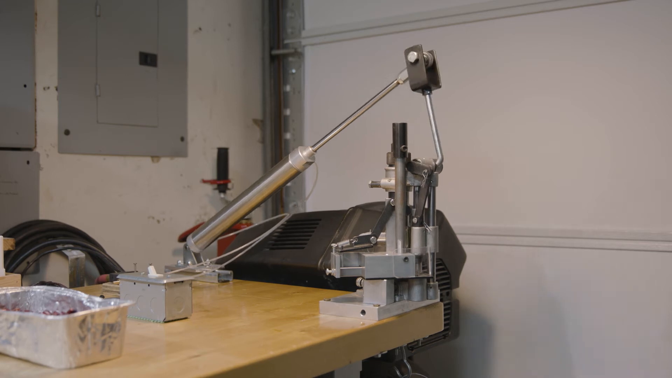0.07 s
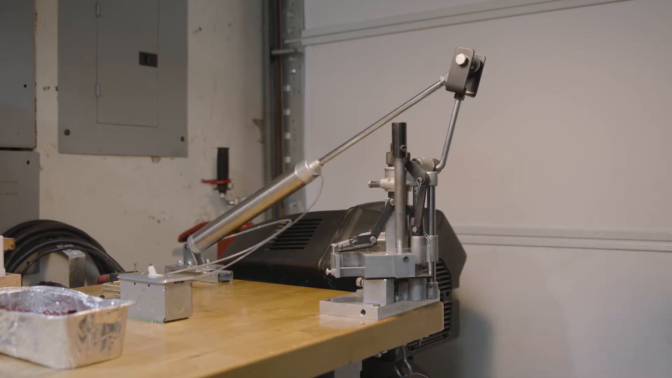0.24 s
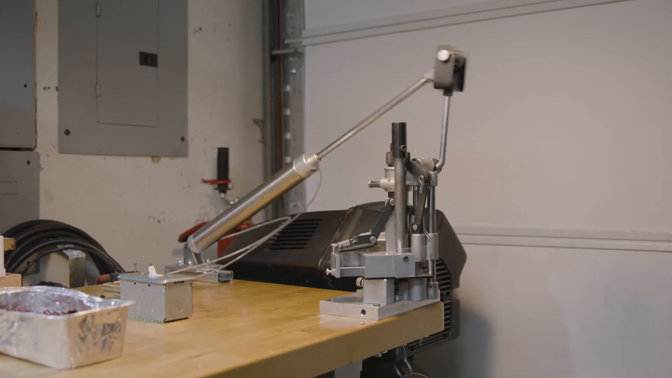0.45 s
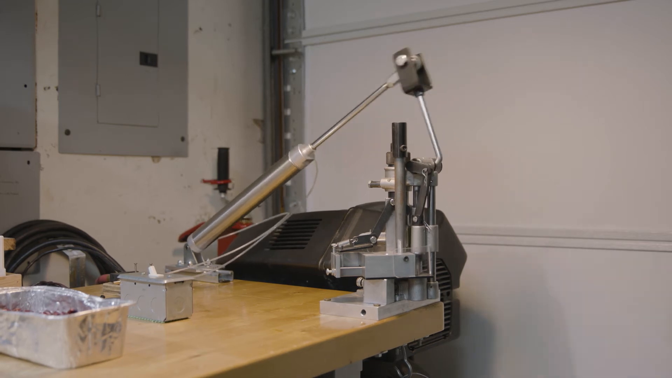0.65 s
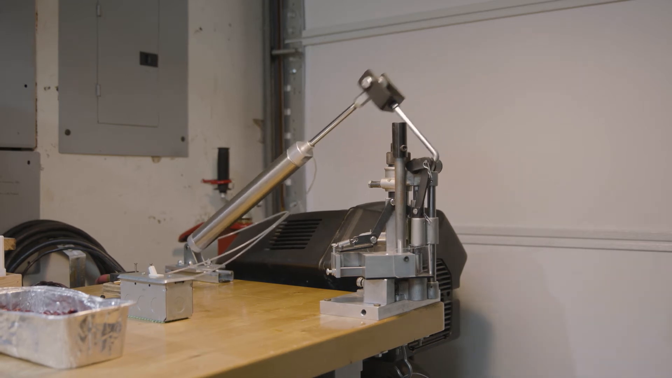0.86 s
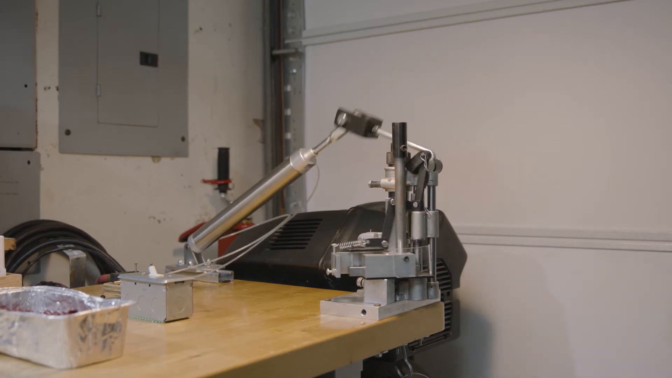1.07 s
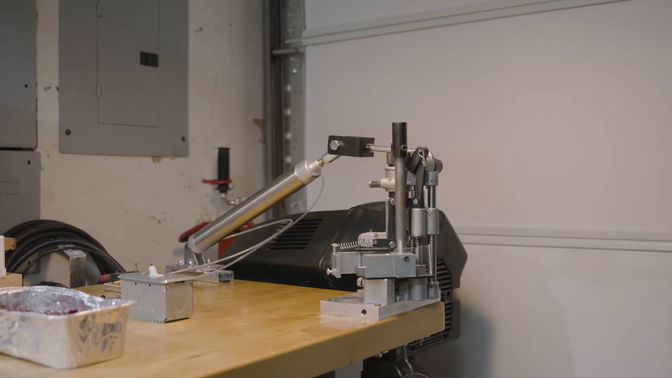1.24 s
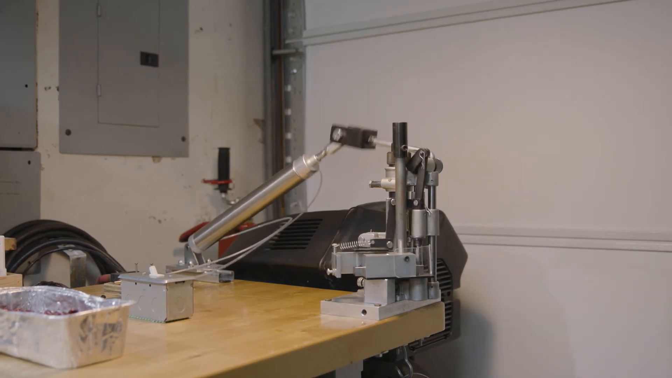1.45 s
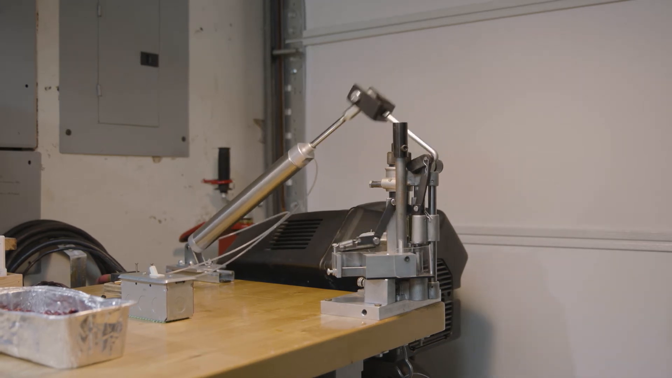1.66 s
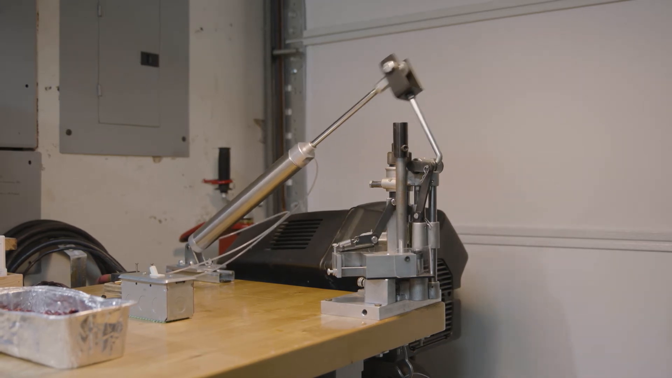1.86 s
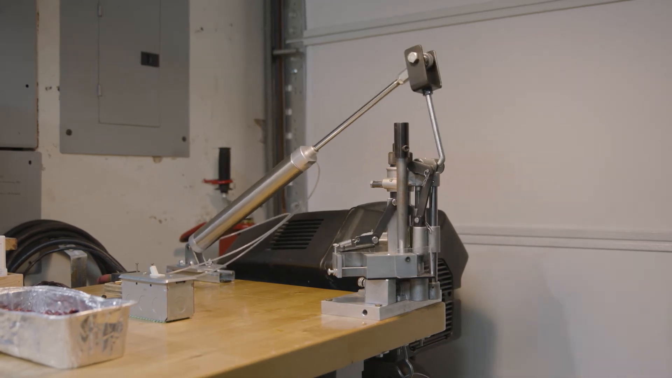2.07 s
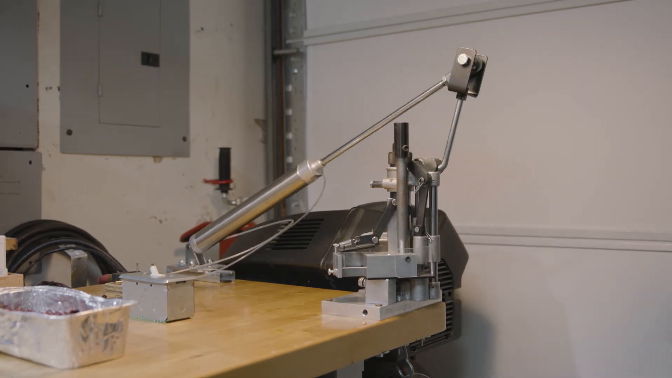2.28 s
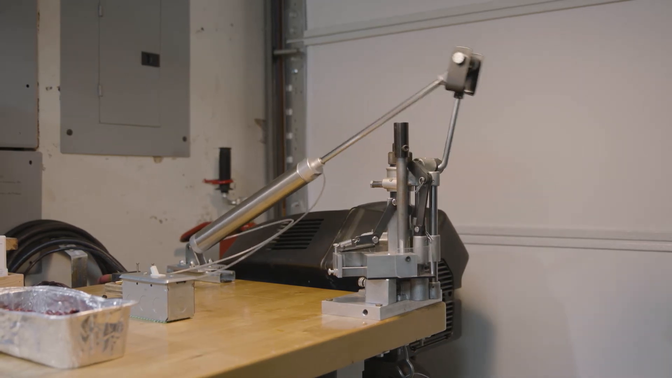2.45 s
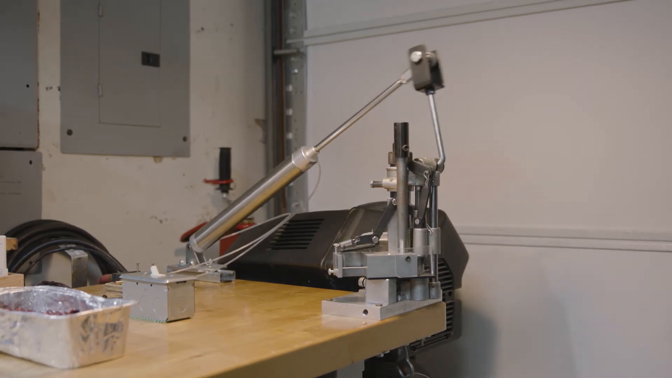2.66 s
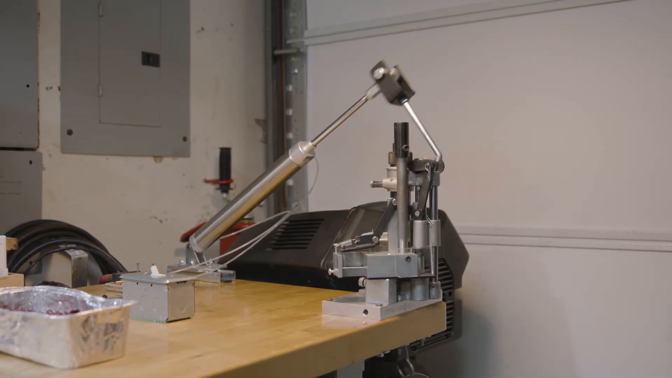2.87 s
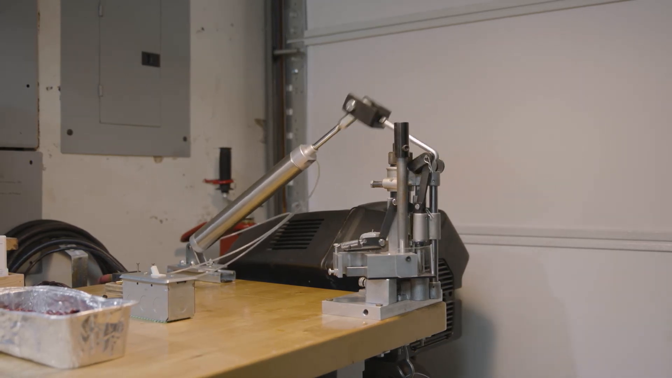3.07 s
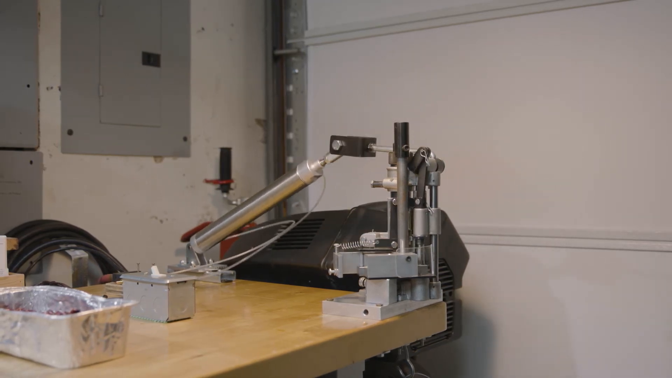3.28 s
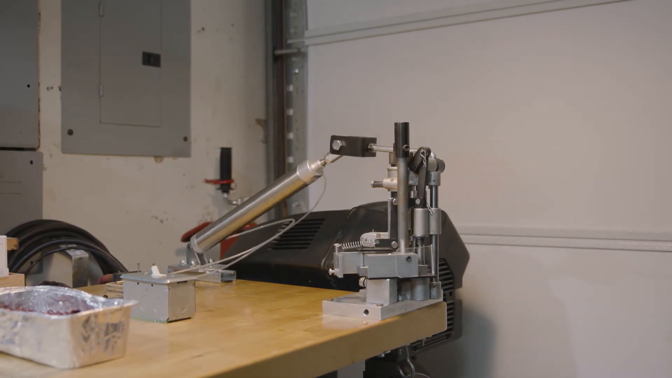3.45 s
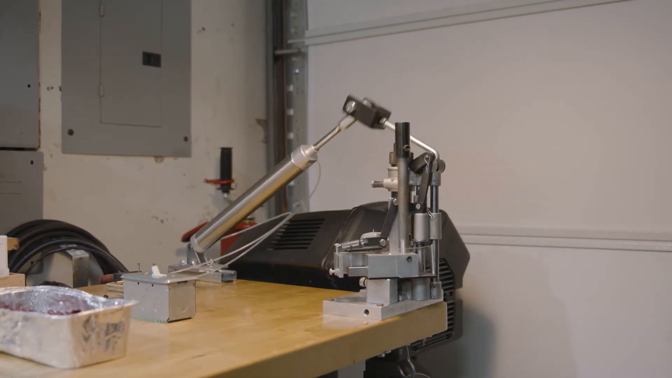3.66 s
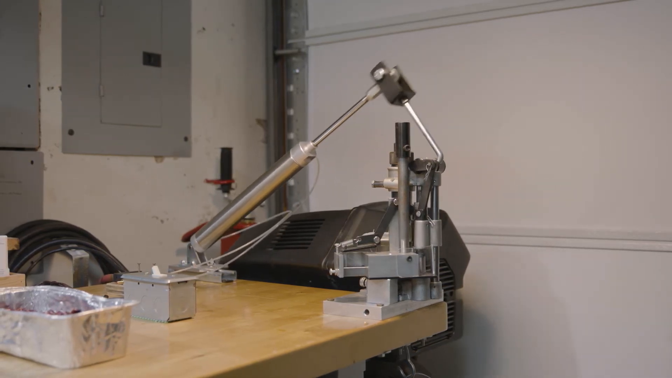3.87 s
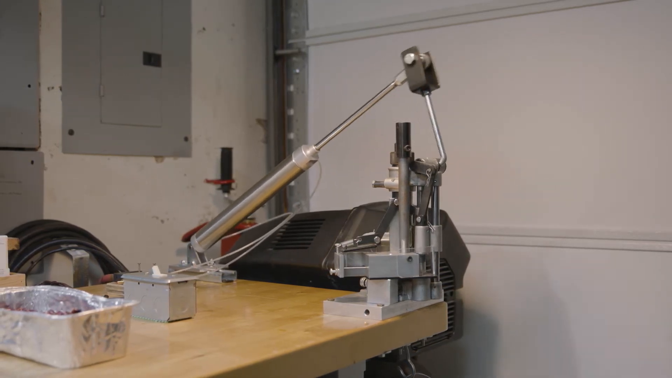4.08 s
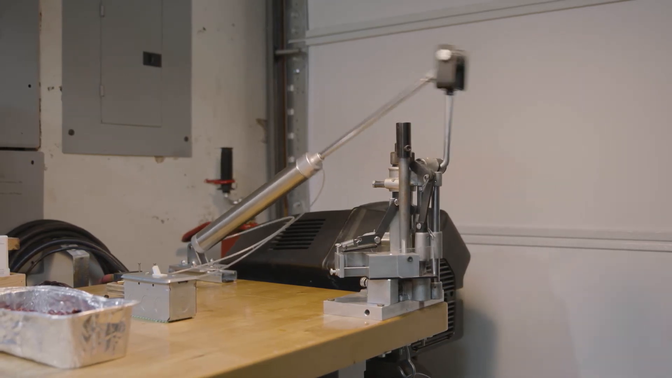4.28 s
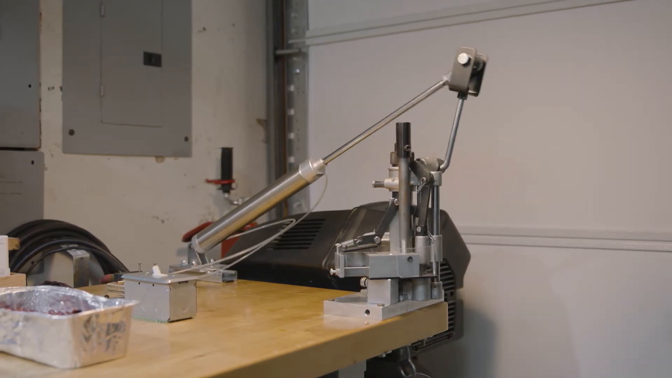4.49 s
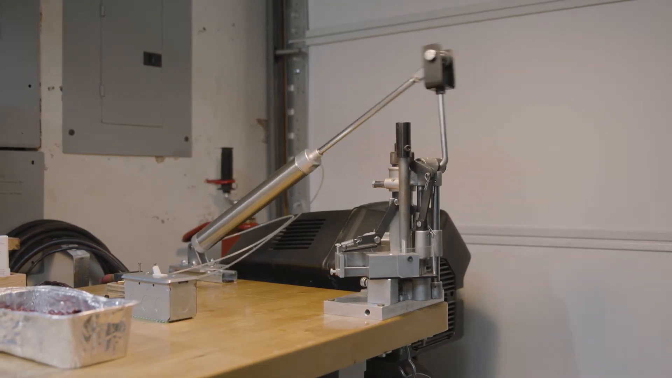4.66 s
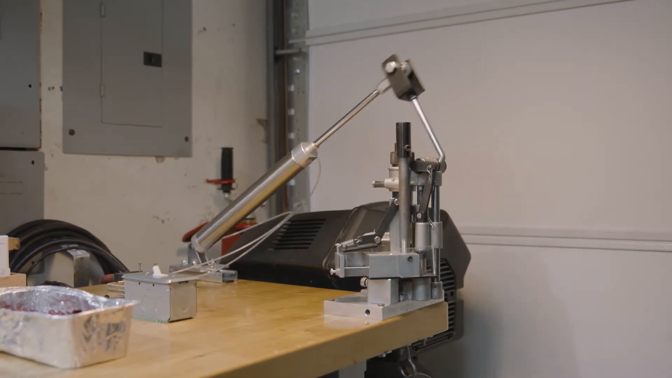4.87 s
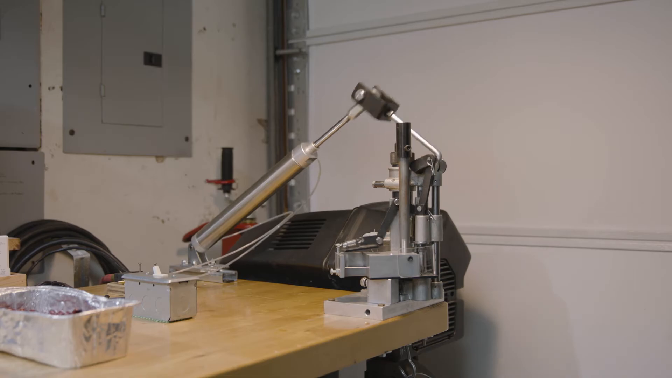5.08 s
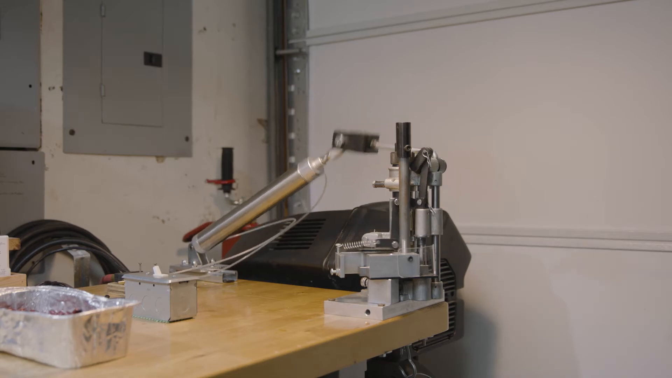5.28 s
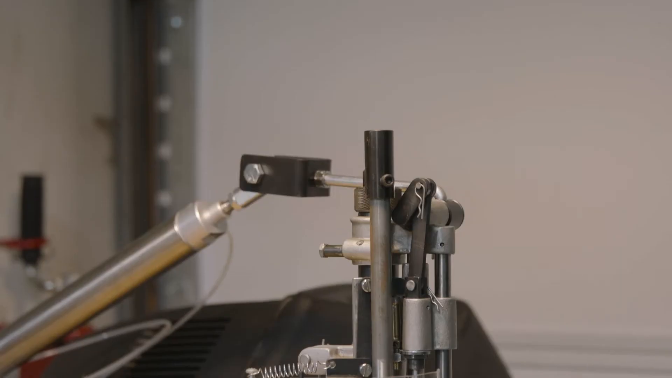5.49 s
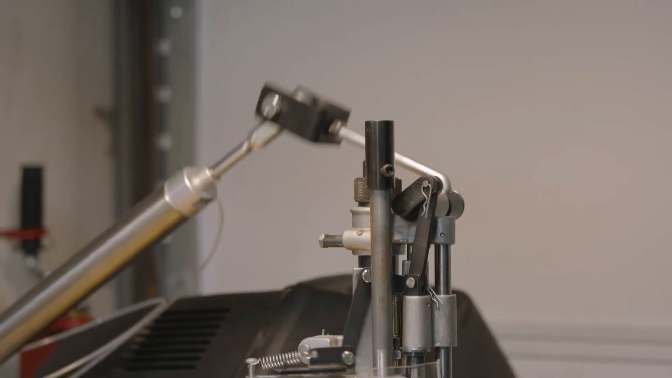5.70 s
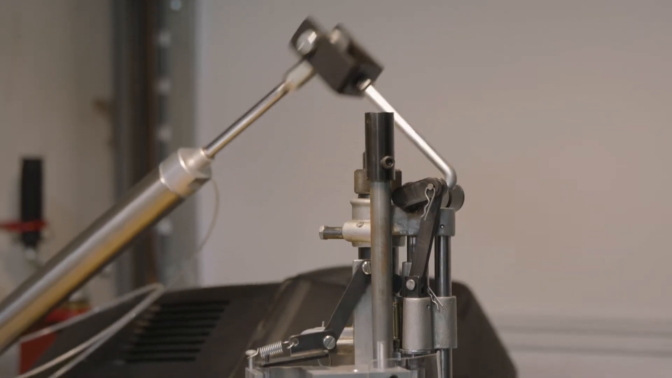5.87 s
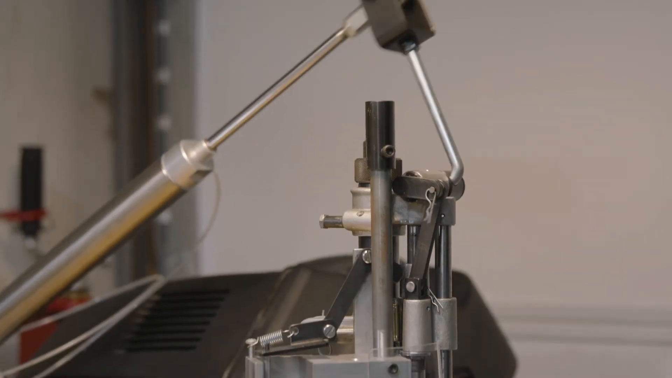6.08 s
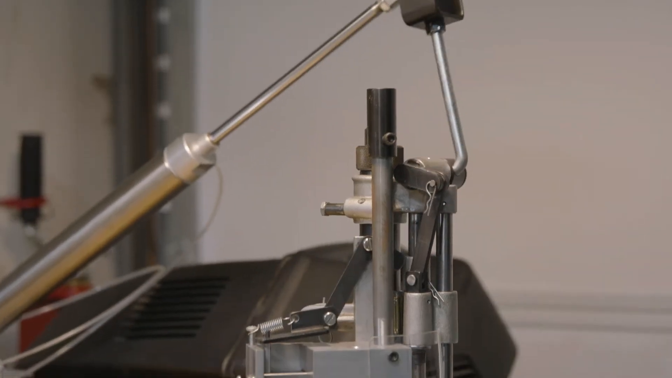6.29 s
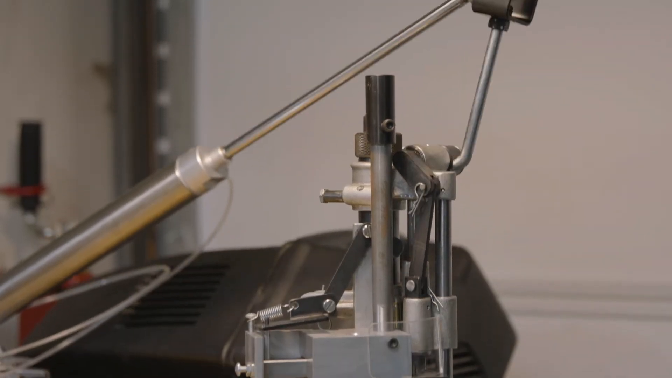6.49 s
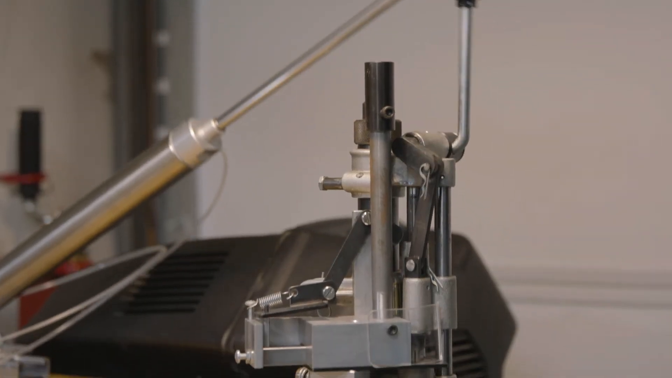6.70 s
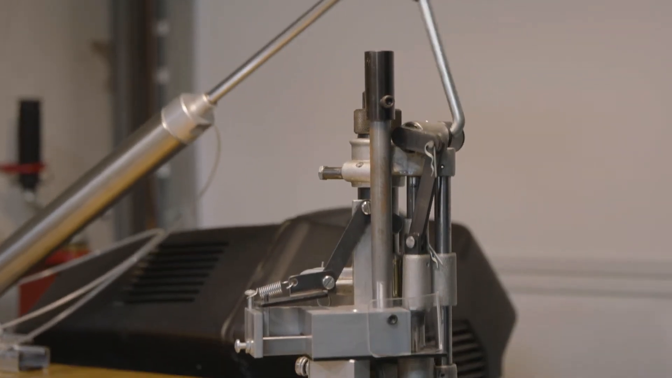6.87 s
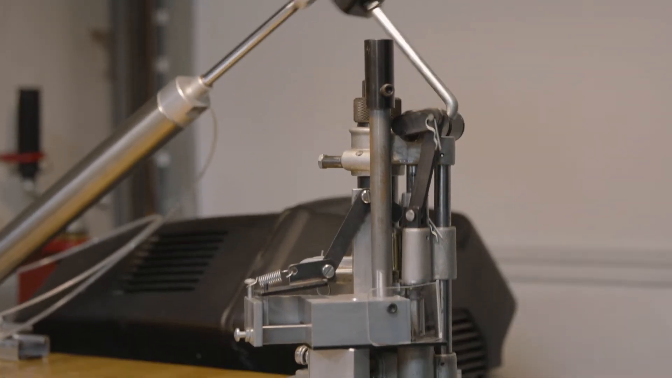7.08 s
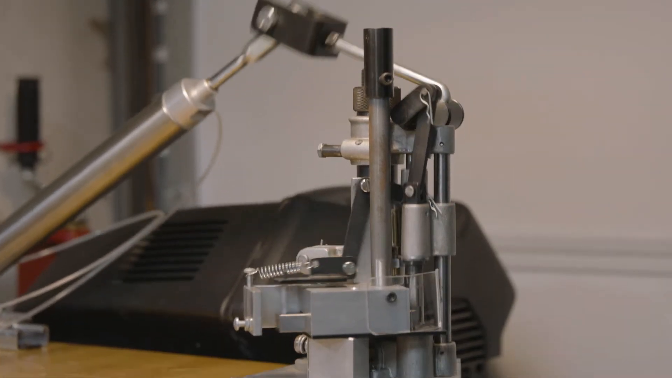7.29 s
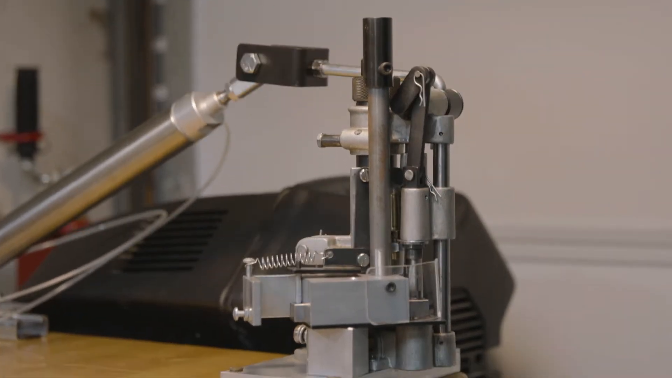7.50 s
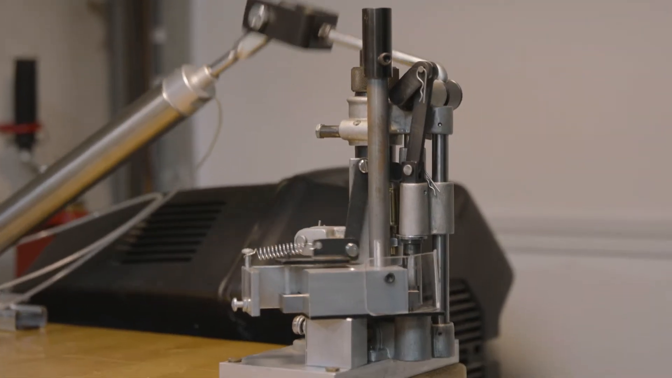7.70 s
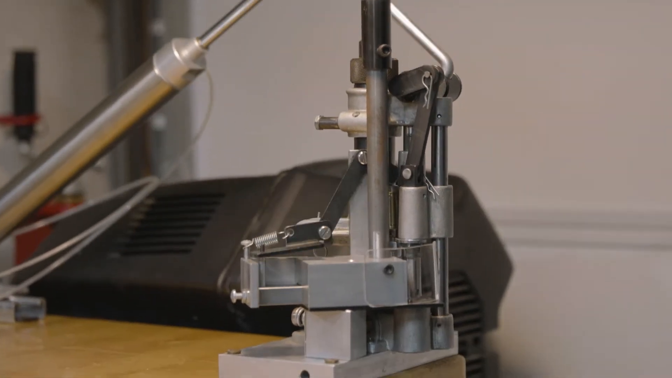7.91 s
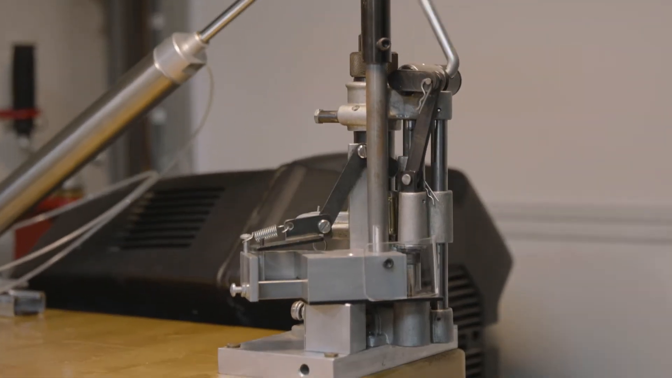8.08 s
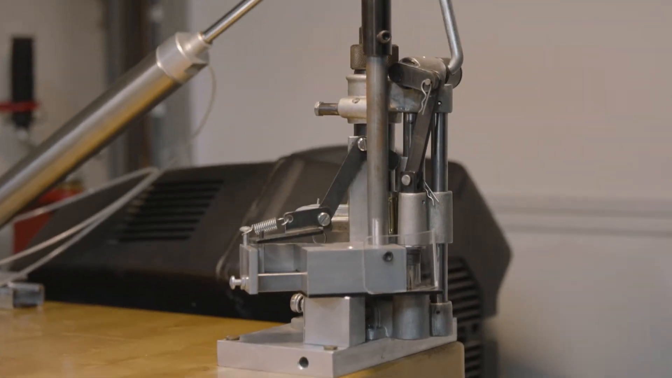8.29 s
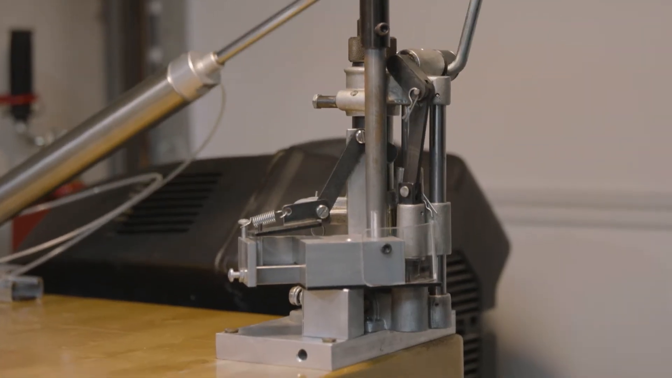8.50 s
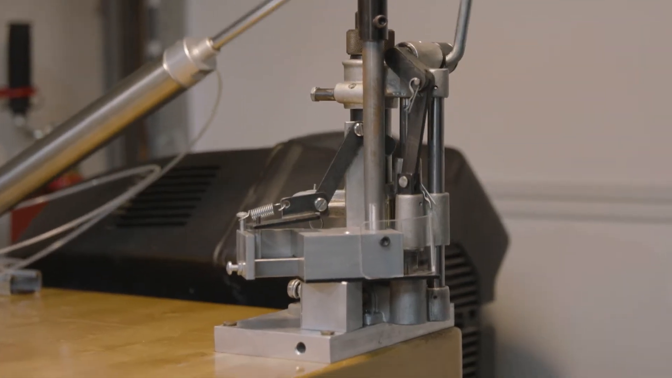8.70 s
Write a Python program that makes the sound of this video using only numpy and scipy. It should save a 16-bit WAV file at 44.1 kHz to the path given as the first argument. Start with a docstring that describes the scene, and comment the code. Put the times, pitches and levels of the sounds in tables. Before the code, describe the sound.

A pneumatic press on a workbench runs in a steady two-second cycle. Air hisses as the lever swings back, joints knock and rattle, a slide snaps, and the lever clanks at the top. A small slug thuds into a plastic tub, sometimes bouncing and clinking, then another hiss ends in a clank at the bottom. Fairly close microphone, low rumble and short workshop reverberation.

```python
"""An air cylinder swings the lever of a bullet-sizing press on a workbench, one cycle every two seconds.
First a return stroke ends: its exhaust jet, shaped noise, hisses while joints knock and a feed slide snaps.
The lever clanks on the top stop, coloured contacts and ringing modes; a bullet thuds into a plastic tub,
a sum of decaying modes, and may bounce and clink. The next pull hisses down to a clank on the bottom stop.
The cycle repeats over a low room rumble, with one faint squeak; decaying noise gives the workshop's answer."""
import sys
import numpy as np
from scipy import signal
from scipy.fft import rfft, irfft, next_fast_len
from scipy.io import wavfile
from scipy.ndimage import map_coordinates

SR = 44100
rng = np.random.default_rng(int(sys.argv[2]) if len(sys.argv) > 2 else 0)


def store_wav(level_fs):
    """Save 16-bit WAV to argv[1]."""
    pcm = np.round(np.clip(np.atleast_2d(level_fs), -1, 1) * 32767)
    wavfile.write(sys.argv[1], SR, pcm.T.astype(np.int16))


N = 385786


def amp(db):
    """Level definition: 20 dB is a factor of ten in amplitude."""
    return 10 ** (np.asarray(db) / 20)


def unit(x):
    """Normalisation to an rms of 1."""
    return x / np.sqrt(np.mean(x ** 2) + 1e-20)


def unit_blow(x):
    """Energy normalisation: a transient is scaled to the energy of 20 ms at rms 1."""
    return x / np.sqrt(np.sum(x ** 2) / (SR / 50))


def along(points, hz):
    """Logarithmic frequency scale: levels are interpolated between (f/Hz, level/dB) points."""
    f, level = np.transpose(points)
    return np.interp(np.log(hz + 1), np.log(f + 1), level)


def add(track, s, sound):
    """Superposition: a sound is summed into the track at time s."""
    start = max(round(s * SR), 0)
    part = sound[:max(N - start, 0)]
    track[start:start + len(part)] += part


def filtered(x, response):
    """Linear filtering: the spectrum is multiplied by a response of frequency."""
    size = next_fast_len(len(x) + 8192)
    spectrum = rfft(x, size) * response(np.fft.rfftfreq(size, 1 / SR))
    return irfft(spectrum, size)[:len(x)]


def coloured(x, colour, size=32768):
    """Minimum-phase filtering: folding the cepstrum gives a causal filter of the given spectrum."""
    cepstrum = irfft(np.log(amp(along(colour, np.fft.rfftfreq(size, 1 / SR)))))
    cepstrum[1:size // 2] *= 2
    cepstrum[size // 2 + 1:] = 0
    return irfft(rfft(x, size) * np.exp(rfft(cepstrum)))[:len(x)]


def wobble(rate):
    """Band-limited fluctuation: a smooth curve through random knots, rate of them a second."""
    knots = rng.standard_normal(int(N * rate / SR) + 4)
    return map_coordinates(knots, [np.arange(N) * rate / SR])


# Ring of press, bench and room together: f/Hz, t60/s before each sound's length factor
ROOM_DECAY = [(80, 0.76), (260, 0.27), (700, 0.47), (1800, 0.41), (5000, 0.39), (13000, 0.32)]


def tail(length):
    """Diffuse decay: dense modes and echoes of energy 1, each band dying at its own speed."""
    noise = rng.standard_normal(SR // 2)
    hz, t, bands = signal.stft(noise, SR, nperseg=256)
    t60 = length * along(ROOM_DECAY, hz)[:, None]
    x = signal.istft(bands * amp(-60 * t / t60), SR, nperseg=256)[1][:SR // 2]
    return x / np.linalg.norm(x)


# Modes of the steel frame and lever: f/Hz, relative level/dB, t60/s
FRAME_MODES = [(525, -3, 0.46), (690, -8.5, 0.27), (805, -22, 0.1), (878, 0, 0.55), (1135, -9.5, 0.61),
               (1190, -16, 0.58), (1245, -2, 0.63), (1559, 5, 0.37), (1910, -14, 0.51), (2233, -4, 0.57),
               (2493, 7.5, 0.26), (2820, -6, 0.2), (3016, 6.5, 0.16), (4550, 7.5, 0.19)]


def blows(events, colour, length, rise, crack_db, steel_db, chatter, renew, count=5):
    """Impact excitation: sharp contacts at irregular gaps of about chatter s, over a ring of which renew is fresh."""
    track, t = np.zeros(N), np.arange(SR // 2) / SR
    own_ring = tail(length)
    steel = sum(amp(db - 60 * t / t60) * np.sin(2 * np.pi * (hz * t + rng.random()))
                for hz, db, t60 in FRAME_MODES)
    steel *= amp(steel_db) / np.linalg.norm(steel)
    for s, db in events:
        ring = np.sqrt(1 - renew) * own_ring + np.sqrt(renew) * tail(length) + steel
        x = ring * (1 - np.exp(-t / rise))
        # the parts rebound and touch again, weaker each time
        touch = np.arange(count)
        delays = chatter * (touch + rng.uniform(0, 0.61, count) * (touch > 0))
        x[(delays * SR).astype(int)] += amp(crack_db - 3.5 * touch) * rng.choice([-1, 1], count)
        add(track, s, amp(db) * unit_blow(coloured(x, colour)))
    return track


# Spectrum of the room rumble: f/Hz, relative level/dB
SHOP_SPECTRUM = [(20, 2), (35, 4.5), (70, -8.5), (150, -14), (400, -6), (1000, -29), (4000, -12),
                 (15000, -24)]


def shop():
    """Stationary noise: random pressure shaped into the low rumble of the room."""
    rumble = filtered(rng.standard_normal(N), lambda f: amp(along(SHOP_SPECTRUM, f)))
    return amp(-58.5) * unit(rumble)


# A pivot or seal squeaks faintly: t/s, length/s, f/Hz (mean), level/dB (rms before the swell)
SQUEAK_EVENTS = [(3.086, 0.12, 810, -48.5)]


def squeaks():
    """Frequency modulation: brief rubbing tones of slightly unsteady pitch."""
    track = np.zeros(N)
    for s, length, hz, db in SQUEAK_EVENTS:
        swell = np.hanning(int(length * SR))
        pitch = hz * (1 + 0.014 * wobble(94)[:len(swell)])
        tone = np.sin(2 * np.pi * np.cumsum(pitch) / SR)
        add(track, s, amp(db) * swell * unit(tone))
    return track


# A bullet lands in the tub: t/s, relative level/dB, glancing (0 square to 1 glancing)
LANDINGS = [(.387, -15.5, 0), (.578, -29, 0.8), (.679, -31.5, 0.87), (2.453, -15, 0.12),
            (2.674, -26.5, 0.34), (4.382, -42, .9), (4.545, -15, 0.06), (4.743, -35.5, 0.35),
            (6.586, -14.5, 0), (6.742, -37.5, .7), (8.640, -15.5, 0)]
# Modes of the plastic tub: f/Hz, mean relative level/dB, t60/s for a square landing
TUB_MODES = [(186, -11, .34), (221, -13, .26), (371, -.7, .3), (458, -2, .16), (478, 1, .16),
             (498, -2, .15), (550, 6.5, .055), (558, -3, .17), (608, 2.5, .135), (640, -3, .13),
             (721, -12, .19), (865, -10, .18), (1265, -21, .25), (1390, -18, .18), (1465, -19, .2)]


def tub():
    """Modal excitation: a square landing booms the whole tub, a glancing bounce mostly its wall."""
    track, t = np.zeros(N), np.arange(SR // 2) / SR
    hz, level, t60 = np.transpose(TUB_MODES)[:, :, None]
    wall_hz = 468
    off_wall = np.minimum(np.abs(np.log2(hz / wall_hz)) / 0.35, 1)
    for s, db, glancing in LANDINGS:
        strength = level + 1.5 * rng.standard_normal(hz.shape) - 24 * glancing * off_wall
        # a bullet that bounces away leaves the wall free to ring longer
        life = t60 * (1 + .4 * glancing * (1 - off_wall))
        # the modes start roughly in step, so the first cycles are the strongest
        phase = 0.51 * rng.standard_normal(hz.shape)
        decay = np.exp(-np.log(1000) * t / life)
        modes = amp(strength) * decay * np.sin(2 * np.pi * hz * t + phase)
        ring = np.sum(modes, axis=0) * (1 - np.exp(-t / 0.0029))
        add(track, s, amp(db) * unit_blow(ring))
    return track


# Light metal contacts among the bullets: t/s, relative level/dB
CLINK_EVENTS = [(0.4953, -23.5), (2.52, -17.5), (2.807, -30), (4.597, -21.5), (4.7372, -32.5),
                (5.1829, -29.5), (6.6245, -22.5), (6.7445, -23), (6.7574, -26), (8.6694, -17.5)]
# Spectra of a landing's thud and of a clink: f/Hz, relative level/dB
THUD_SPECTRUM = [(40, -7), (120, -23), (500, 1), (1000, -11), (1500, -12.5), (2200, -15), (8000, -31),
                 (15000, -29)]
CLINK_SPECTRUM = [(200, -15), (1200, -8), (1900, -6.5), (2350, 0), (3300, -4), (4300, -4.5), (5500, -11.5),
                  (8000, -9.5), (15000, -13.5)]


def bullets():
    """Impact of small masses: the tub rings under each thud, and metal clinks on metal."""
    landings = [(s, db - 12 * glancing) for s, db, glancing in LANDINGS]
    thuds = blows(landings, THUD_SPECTRUM, length=1.34, rise=0.0013,
                  crack_db=-13, steel_db=-12, chatter=0.0072, renew=0.27)
    clinks = blows(CLINK_EVENTS, CLINK_SPECTRUM, length=0.84, rise=0.00037,
                   crack_db=-12, steel_db=-11, chatter=0.0076, renew=0.63)
    return amp(0.45) * tub() + amp(-10.5) * thuds + amp(-7.5) * clinks


# Whistling resonances of the exhaust port: f/Hz, width/Hz, level/dB (added to a direct path of 0 dB)
PORT_RESONANCES = [(2940, 140, -7), (4200, 120, -33), (4480, 320, -13), (5460, 650, -11.5),
                   (10150, 720, -15.5)]


def hiss(colour):
    """Turbulence noise: random air pressure of rms 1 through the resonances of the exhaust port."""
    def response(f):
        port = 1 + sum(amp(db) / (1 + (2 * (f - hz) / width) ** 2) for hz, width, db in PORT_RESONANCES)
        return amp(along(colour, f)) * port
    return unit(filtered(rng.standard_normal(N), response))


def flow(strokes, sag_db, opening, closing, hold=0, fall_db=0):
    """Discharge: flow sags (dB/s), with any extra fall after hold s as the cylinder runs empty."""
    t, gain = np.arange(N) / SR, np.zeros(N)
    for opens, shuts, db in strokes:
        age = np.maximum(t - opens, 0)
        valve = (1 - np.exp(-age / opening)) * np.exp(-np.maximum(t - shuts, 0) / closing)
        gain += valve * amp(db - sag_db * age - fall_db * np.maximum(age - hold, 0))
    return gain


# The cylinder pulls the lever down: valve opens t/s, ram hits the bottom stop t/s
PULL_STROKES = [(.380, 1.235), (2.440, 3.303), (4.515, 5.341), (6.578, 7.43), (8.632, 9.48)]
# The lever swings back: valve opens t/s, air relative level/dB, lever tips over t/s,
# its knock's relative level/dB, lever hits the top stop t/s
RETURN_STROKES = [(-.64, -7, .181, -21, .285), (1.424, 0, 2.22, -21.5, 2.337), (3.491, 0, 4.27, -31, 4.409),
                  (5.558, 0, 6.349, -22, 6.471), (7.620, 0, 8.394, -21.5, 8.52)]
# Spectra of the air before the port, pull and return: f/Hz, relative level/dB
PULL_SPECTRUM = [(150, -57), (250, -13), (421, -22), (460, -28), (547, -2), (607, -8.5), (802, -11),
                 (938, -8), (1380, -9.5), (1530, -4.5), (3010, 0), (5440, -1), (6940, -5.5), (10200, -1.5),
                 (16000, -5)]
RETURN_SPECTRUM = [(150, -48), (250, -41), (287, -15), (407, -34), (436, 7.5), (476, -33), (528, -5),
                   (629, -16.5), (875, -14), (955, -12), (1350, -8.5), (3120, -2), (5930, -3), (12500, 0),
                   (16000, -6.5)]
# the valve shuts this long after the bottom stop and after the top stop (s)
PULL_SHUTS_S, RETURN_SHUTS_S = .013, .004


def exhaust():
    """Jet noise: each stroke vents one side; the return jet dulls as its pressure drops."""
    pulls = [(opens, stop + PULL_SHUTS_S, 0) for opens, stop in PULL_STROKES]
    returns = [(opens, stop + RETURN_SHUTS_S, db) for opens, db, *_, stop in RETURN_STROKES]
    pull = amp(-40.0) * hiss(PULL_SPECTRUM) * flow(pulls, sag_db=2.0, opening=0.0099, closing=0.0053)
    jet = amp(-38.0) * hiss(RETURN_SPECTRUM)
    body = filtered(jet, lambda f: 1 / (1 + (f / 7000) ** 4))
    treble = jet - body
    back = body * flow(returns, sag_db=8, opening=0.0093, closing=.008)
    back += treble * flow(returns, hold=.46, sag_db=7, fall_db=22, opening=.006, closing=.006)
    air = (pull + back) * amp(1.06 * wobble(42))
    reverberant = signal.fftconvolve(air, tail(length=0.97))[:N]
    return amp(-0.5) * air + amp(-4.5) * reverberant


# Low modes of the lever and its rod: f/Hz, mean level/dB relative to the clunk, t60/s
LEVER_MODES = [(116, -10, 0.22), (172, -2.5, 0.16), (263, -3, .28), (302.3, 1.5, 0.2), (500, -4, 0.26),
               (553, -1, .2), (1046, -10, 0.33)]
CLUNK_DB, CLUNK_RISE_S = -8, 0.0029  # level added to the tipping knock's table level, and rise


def clunks():
    """Modal ringing: the tipping lever drops into its joint's slack and rings in its low modes."""
    track, t = np.zeros(N), np.arange(SR // 2) / SR
    hz, level, t60 = np.transpose(LEVER_MODES)[:, :, None]
    for _, _, tips, db, _ in RETURN_STROKES:
        strength = level + 1.1 * rng.standard_normal(hz.shape)
        modes = amp(strength - 60 * t / t60) * np.sin(2 * np.pi * (hz * t + rng.random(hz.shape)))
        ring = np.sum(modes, axis=0) * (1 - np.exp(-t / CLUNK_RISE_S))
        add(track, tips, amp(db + CLUNK_DB) * ring)
    return track


def on_each_return(pattern):
    """Periodic excitation: contacts come at the same points of every return stroke."""
    return [(opens + delay, db) for opens, *_ in RETURN_STROKES
            for delay, db in pattern if opens + delay > 0]


# The joints take up their slack on every return: t/s after the valve opens, relative level/dB
SLACK_KNOCKS = [(.005, -25.5), (.035, -24.5), (.32, -31.5), (.505, -34.5), (.676, -44)]
# rattle in the joint: time between contacts (s), level against the knock (dB), loss at each contact (dB)
RATTLE_S, RATTLE_DB, RATTLE_LOSS_DB = .027, -3.5, 4
# knock late in each pull: time before the bottom stop (s), relative level (dB)
PULL_KNOCK_LEAD_S, PULL_KNOCK_DB = .245, -35.5


def linkage_knocks(count=3):
    """Impact with loss: slack going up, a weakening rattle at the tip, one knock going down."""
    rattles = [(tips + k * RATTLE_S, db + RATTLE_DB - k * RATTLE_LOSS_DB)
               for _, _, tips, db, _ in RETURN_STROKES for k in range(count)]
    pulls = [(stop - PULL_KNOCK_LEAD_S, PULL_KNOCK_DB) for _, stop in PULL_STROKES]
    return on_each_return(SLACK_KNOCKS) + rattles + pulls


# The feed slide scrapes forward in two jerks: t/s after the valve opens, relative level/dB
SLIDE_JERKS = [(.315, -28), (.335, -30)]
# Spectra of bottom stop, top stop, knocks, slide scrape, slide snap and bench: f/Hz, relative level/dB
BOTTOM_SPECTRUM = [(24, -4.5), (45, -17), (90, -12), (195, -15.5), (222, -3.5), (265, 2.5), (380, 2),
                   (560, -3), (780, -9.5), (1250, -9), (2000, -13), (4700, -17.5), (7000, -20.5),
                   (16000, -32)]
TOP_SPECTRUM = [(24, 1), (42, -6), (65, -15), (100, -6.5), (270, -3), (360, 9), (450, -1), (620, -1),
                (1200, 0), (1600, -7.5), (2500, -4.5), (3800, -13), (9200, -16.5), (16000, -21)]
KNOCK_SPECTRUM = [(40, -10), (175, -10), (200, -13), (262, 1.5), (282, -8), (305, 4), (340, 0.5),
                  (450, 5.5), (505, 0), (760, -5.5), (1100, -7), (2000, -13), (5000, -28.5), (15000, -33)]
SCRAPE_SPECTRUM = [(200, -35), (1000, -7), (1600, -14.5), (2000, -1), (2500, -11), (3200, -1.5),
                   (4000, -12), (8000, -14), (15000, -14)]
SNAP_SPECTRUM = [(200, 0), (1500, 4.5), (4000, -1.5), (5600, 1), (6150, 2.5), (6700, -3.5), (15000, -13)]
BENCH_SPECTRUM = [(20, -11), (35, -2), (65, -6), (110, -16), (170, -18), (300, -25), (1000, -60)]
# relative levels of the end stops and the slide's snap (dB), and the snap's lead on the top stop (s)
BOTTOM_DB, TOP_DB, SNAP_DB, SNAP_LEAD_S = -9, -10.5, -22.5, .070


def press():
    """Impact of heavy masses: clanks at the end stops, with linkage knocks, scrapes and snaps between."""
    bottoms = [(stop, BOTTOM_DB) for _, stop in PULL_STROKES]
    tops = [(stop, TOP_DB) for *_, stop in RETURN_STROKES]
    snap_events = [(stop - SNAP_LEAD_S, SNAP_DB) for *_, stop in RETURN_STROKES]
    # the piston shoves off against its mount and shakes the bench
    shoves = [(opens, -45) for opens, *_ in RETURN_STROKES if opens > 0]
    bottom = blows(bottoms, BOTTOM_SPECTRUM, length=0.73, rise=0.0018,
                   crack_db=-11.5, steel_db=-16.5, chatter=.0045, renew=0.47)
    top = blows(tops, TOP_SPECTRUM, length=0.86, rise=0.00016,
                crack_db=-16.5, steel_db=-14.5, chatter=0.0025, renew=0.14)
    knocks = blows(linkage_knocks(), KNOCK_SPECTRUM, length=0.77, rise=0.00066,
                   crack_db=-13.5, steel_db=-19.5, chatter=0.0057, renew=0.44)
    scrapes = blows(on_each_return(SLIDE_JERKS), SCRAPE_SPECTRUM, length=0.73, rise=0.0018,
                    crack_db=-15, steel_db=-11.5, chatter=0.0066, renew=1.0)
    snaps = blows(snap_events, SNAP_SPECTRUM, length=.85, rise=.001,
                  crack_db=0, steel_db=-24, chatter=.0005, renew=.4, count=1)
    bench = blows(shoves, BENCH_SPECTRUM, length=0.56, rise=0.005,
                  crack_db=-17, steel_db=-30, chatter=.01, renew=0.25)
    stops = amp(-9.5) * bottom + amp(-8.0) * top
    linkage = amp(-8) * knocks + amp(-8.5) * scrapes + amp(-12.5) * snaps
    return stops + linkage + bench


# The microphone stands in a null of the room's standing waves: f/Hz, width/Hz
ROOM_NULL = (412, 36)


def scene():
    """Superposition and interference: all sources sum, and a standing-wave null notches the result."""
    mono = shop() + squeaks() + bullets() + exhaust() + clunks() + press()
    hz, width = ROOM_NULL
    mono = filtered(mono, lambda f: (hz ** 2 - f ** 2) / (hz ** 2 - f ** 2 + 1j * f * width))
    return np.array([mono, mono])


CUT_HZ = 16000


def record(dry):
    """Band limitation: one microphone on both channels passes only what lies below its limit."""
    return np.array([filtered(x, lambda f: f < CUT_HZ) for x in dry])


dry = scene()
out = record(dry)
store_wav(out)
```